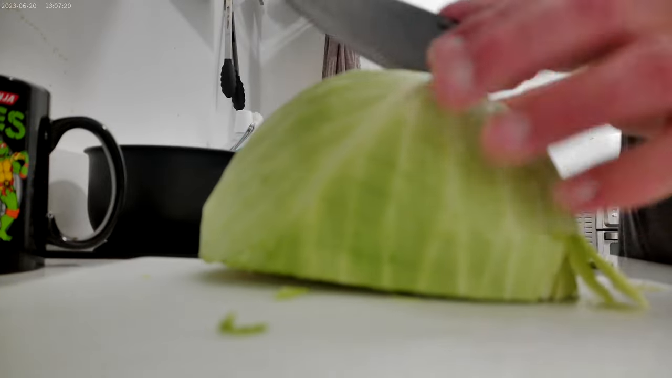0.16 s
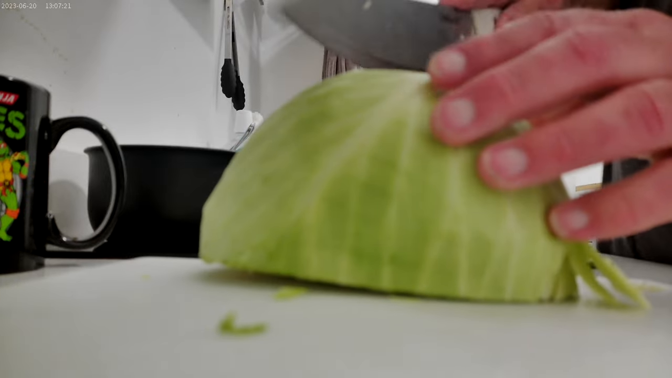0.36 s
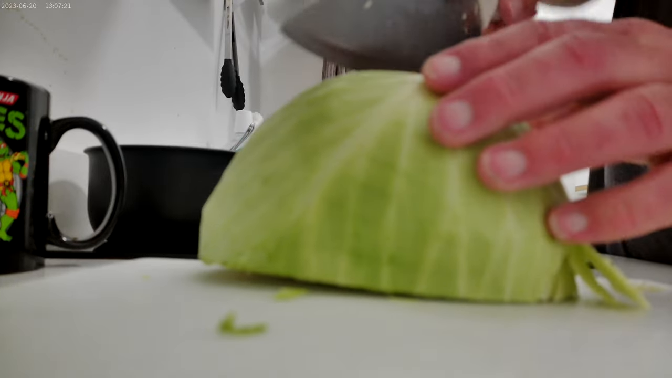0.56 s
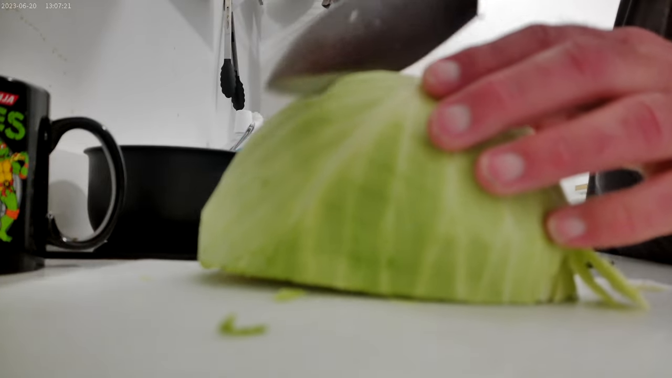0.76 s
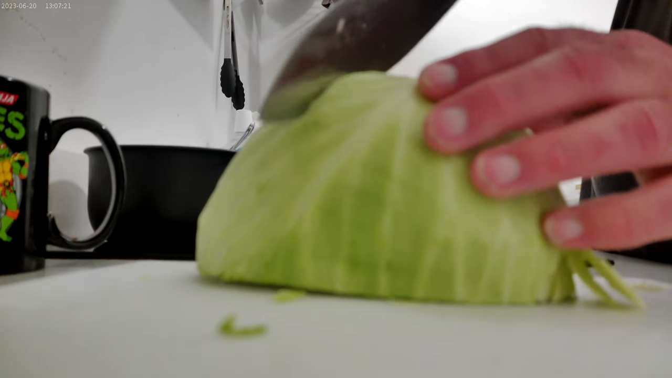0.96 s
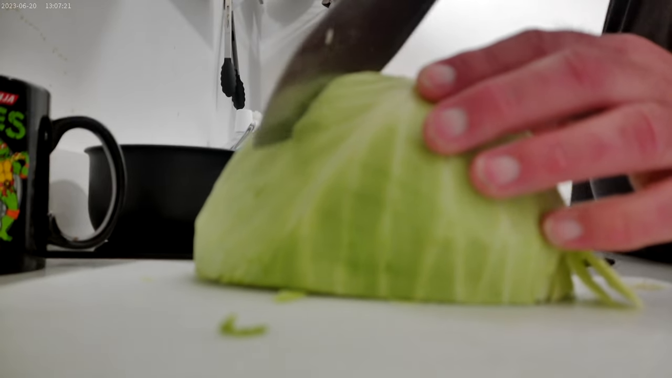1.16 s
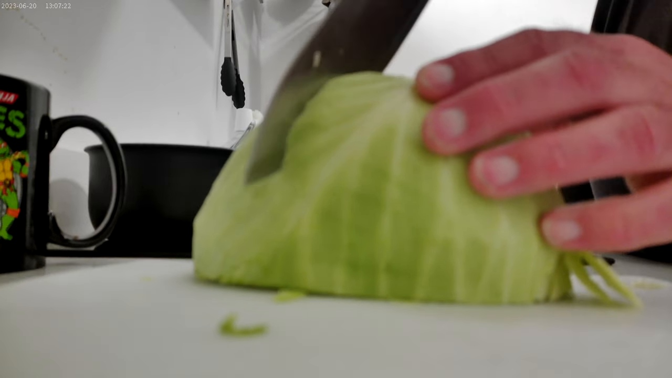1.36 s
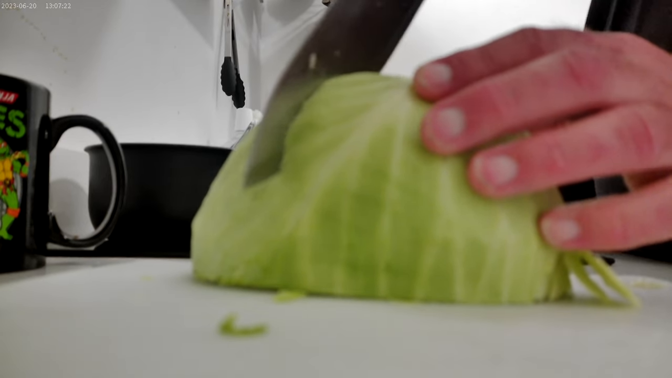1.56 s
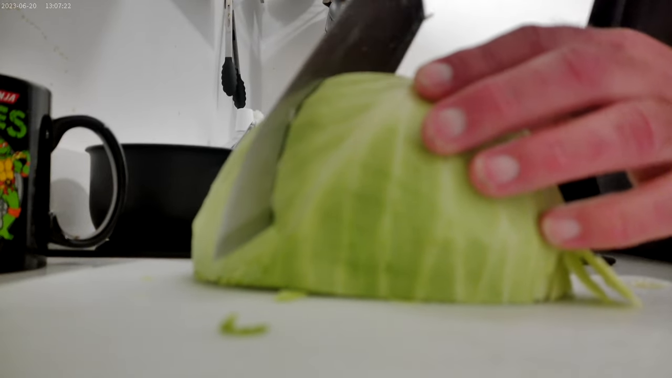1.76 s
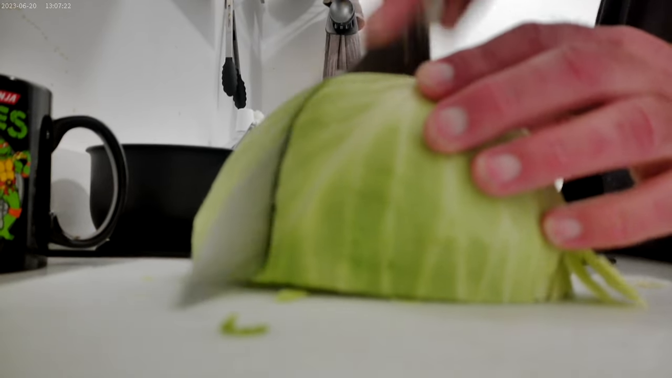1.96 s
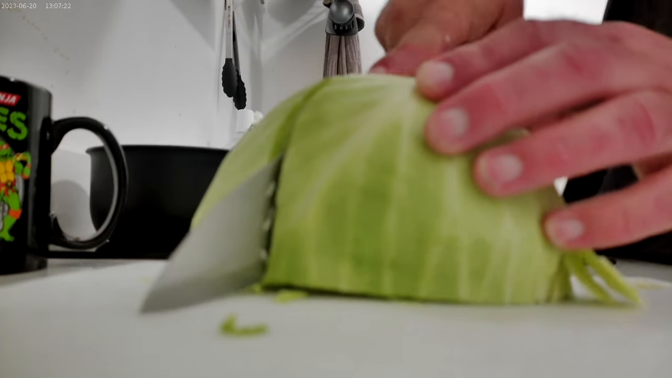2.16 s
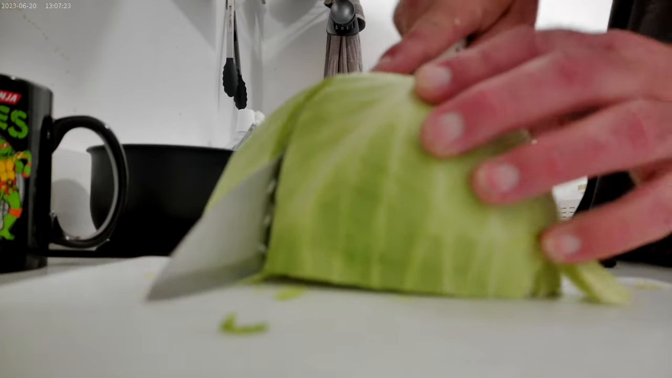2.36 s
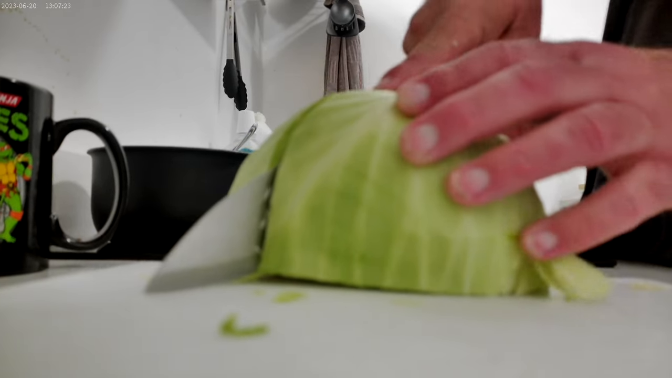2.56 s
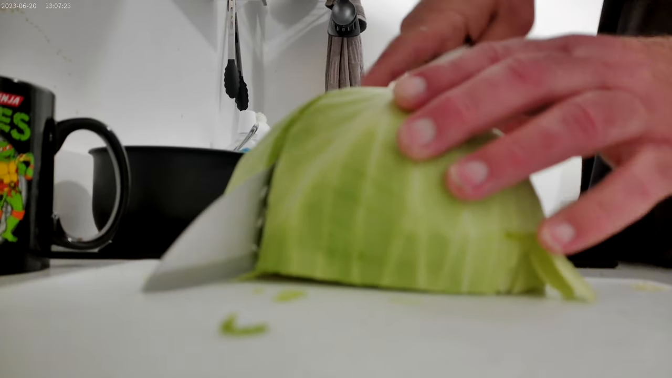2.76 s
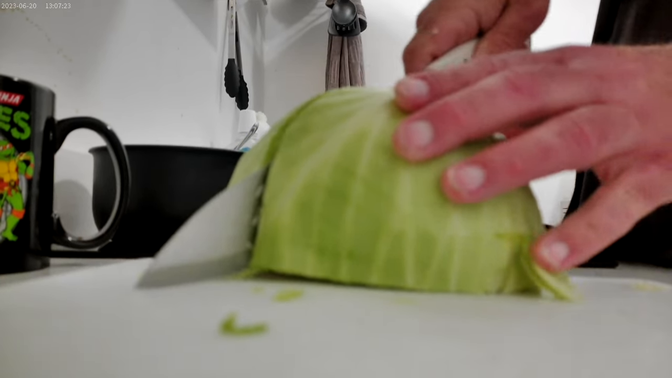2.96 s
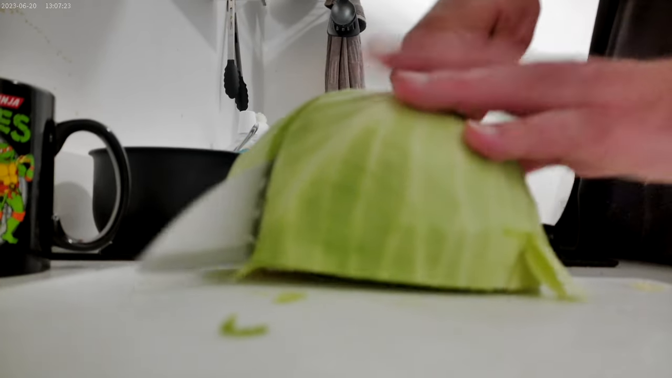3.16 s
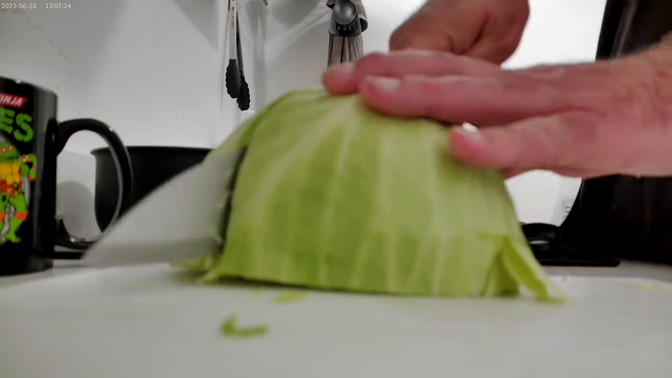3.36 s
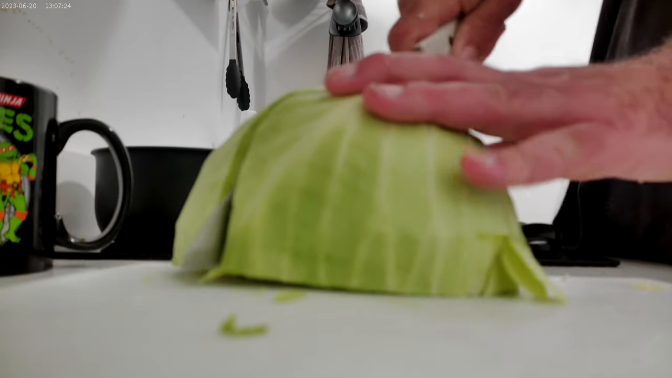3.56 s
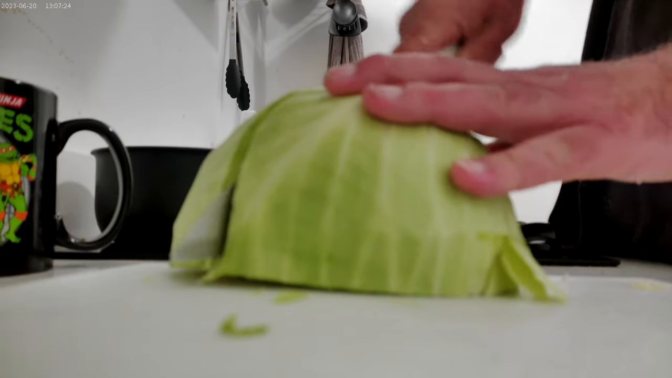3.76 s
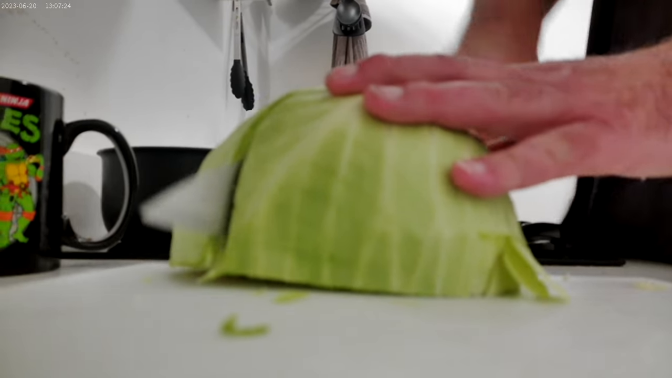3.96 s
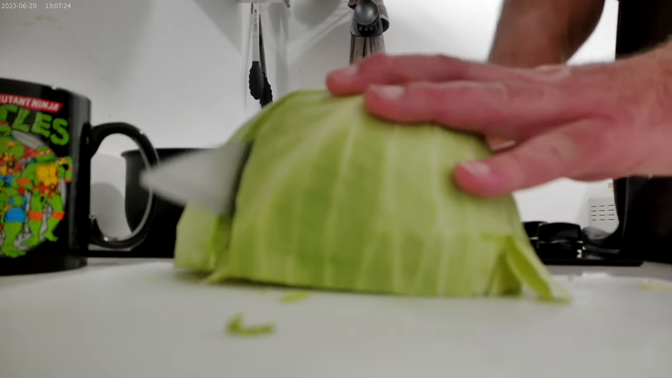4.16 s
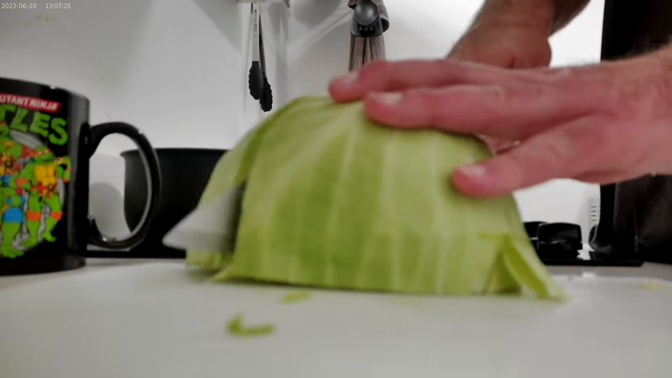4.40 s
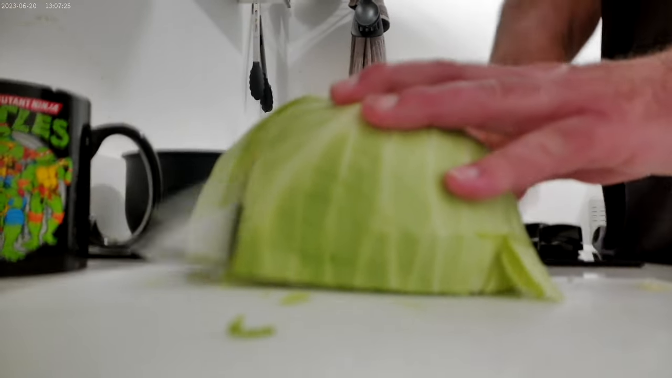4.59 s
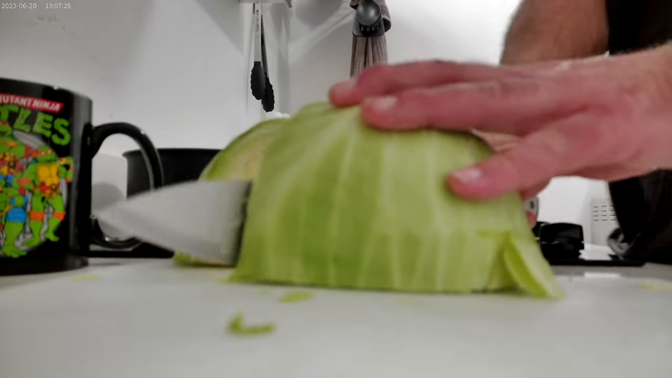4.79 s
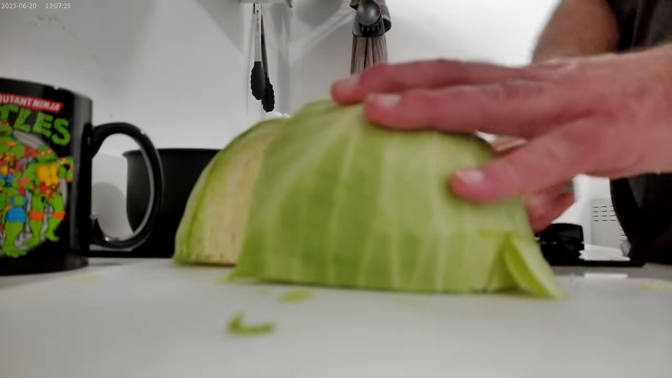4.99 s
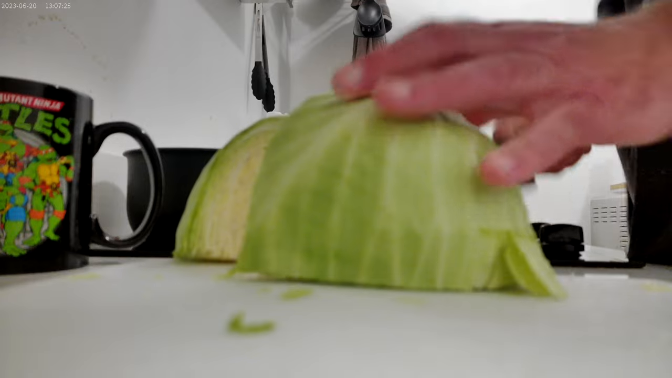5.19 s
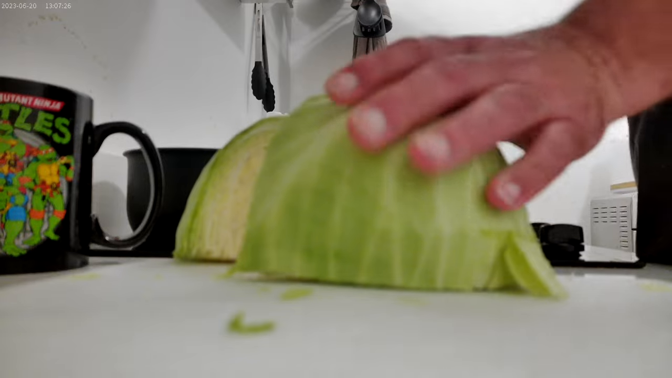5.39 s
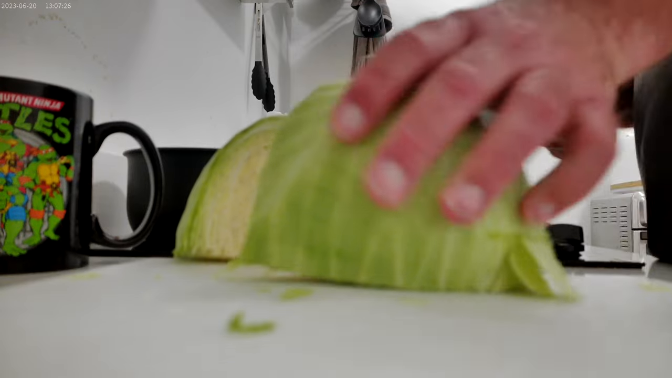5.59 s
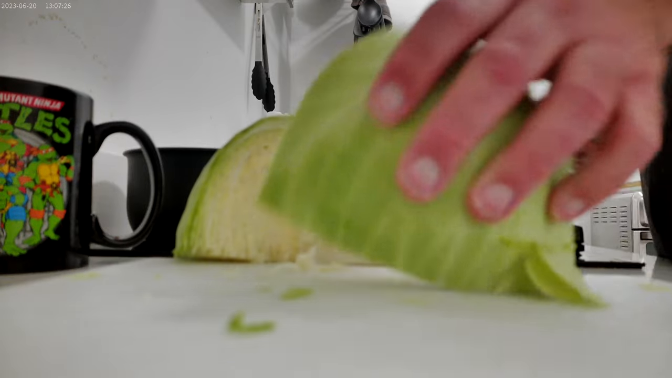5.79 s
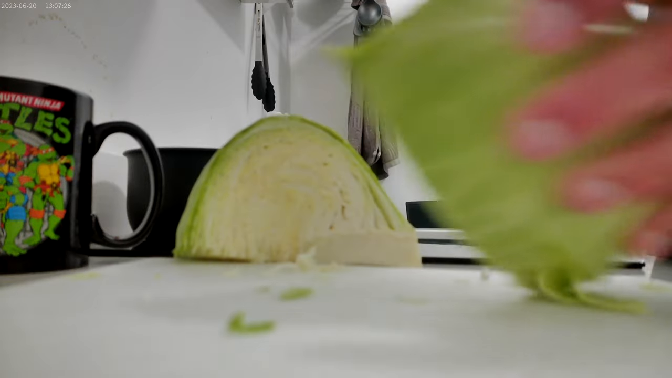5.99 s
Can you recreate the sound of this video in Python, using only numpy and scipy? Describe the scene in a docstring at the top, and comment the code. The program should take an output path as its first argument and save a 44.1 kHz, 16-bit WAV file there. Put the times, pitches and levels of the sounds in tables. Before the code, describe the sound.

A knife cuts into half a cabbage on a plastic board, close to a microphone on the same counter. Small leaf cracks build into hollow crunches, then the blade bangs the board. After more crunching and a short lull, a second run of tearing ends in another loud bang. Dull counter thuds sit under the pushes, and a small kitchen hums faintly throughout.

```python
"""Cutting a cabbage

A knife works through half a cabbage on a plastic board, heard from a microphone on the same counter.
Leaves tear in strokes and single cracks that ring the hollow head, and the counter rocks under the
push. Twice the blade bangs the board and overloads the recorder; when freed, it sings faintly.
A small kitchen hums and rings behind."""
import sys
import numpy as np
from scipy import signal
from scipy.io import wavfile
from scipy.ndimage import uniform_filter1d

SR = 44100
rng = np.random.default_rng(int(sys.argv[2]) if len(sys.argv) > 2 else 0)


def master(y):
    """Save y as 16-bit WAV."""
    cut = np.clip(np.atleast_2d(y).T, -1, 1)
    pcm = np.round(cut * 32767)  # scale
    wavfile.write(sys.argv[1], SR, pcm.astype(np.int16))


N = 266364


def amp(db):
    return 10 ** (np.asarray(db) / 20)


def unit_rms(x):
    return x / np.sqrt(np.mean(x ** 2) + 1e-20)


def curve_at(points, hz):
    point_hz, value = np.transpose(points)
    return np.interp(np.log(hz + 1), np.log(point_hz + 1), value)


def add(mix, start, sound):
    part = mix[round(start * SR):][:len(sound)]
    part += sound[:len(part)]


def burst(size, length, t60, rise):
    """Envelope with a quick attack, held until `length` seconds, then dying away."""
    t = np.arange(size) / SR
    return np.minimum(t / rise, 1) * amp(-60 * np.maximum(t - length, 0) / t60)


def crackle(size, per_s, spread_db):
    """Random clicks of either sign, a few of them large."""
    chance, sign, strength = rng.random((size, 3)).T
    clicks = (chance < per_s / SR) * np.sign(sign - .5)
    return unit_rms(clicks * amp(-spread_db * np.log(strength + 0.09)))


def ring(x, hz, width_hz):
    """One damped mode with steep skirts and a pitch that may wander; white noise keeps its level."""
    carrier = np.exp(2j * np.pi * np.cumsum(hz * np.ones(len(x))) / SR)
    pole = np.exp(-np.pi * width_hz / SR)
    baseband = signal.lfilter([1], np.poly([pole, pole]), x * carrier.conj())
    gain = np.sqrt(2 * (1 - pole ** 2) ** 3 / (1 + pole ** 2))
    return gain * (carrier * baseband).imag


def resonate(force, modes, pitch_hz=None, focus_db=0):
    """A force rings modes, most near its pitch; wet leaves damp them and they drift as layers give."""
    layer_s, drift_share, drift_db = .02, 0.055, 1.5  # time per leaf layer; pitch and level spread
    force = np.r_[force, np.zeros(SR // 50)]
    t = np.arange(len(force)) / SR
    layers = np.arange(0, len(force) / SR + layer_s, layer_s)
    sound = np.zeros(len(force))
    for hz, width_hz, db in modes:
        octaves_off = 0 if pitch_hz is None else np.log2(hz / pitch_hz)
        pitch_drift, level_drift = rng.standard_normal((2, len(layers)))
        level_db = db - focus_db * octaves_off ** 2 + np.interp(t, layers, drift_db * level_drift)
        wandering_hz = hz * (1 + np.interp(t, layers, drift_share * pitch_drift))
        sound += ring(force * amp(level_db), wandering_hz, max(width_hz, hz / 6))
    return sound * np.linalg.norm(force) / np.linalg.norm(sound)


# The tone of the house rumble. Each row: frequency in Hz, relative level in dB.
RUMBLE_SPECTRUM = [(12, -44.5), (20, -12.5), (38, -2.5), (103, -4.5), (147, 1.5), (245, -5), (264, -28),
                   (300, -1), (388, -27.5), (514, -34), (857, -35), (925, -37.5), (2210, -59),
                   (9000, -62.5), (11700, -96), (19800, -120)]


def house_rumble():
    """A bed of low noise, with patches of its spectrum drifting up and down."""
    frames, hz = N // 512 + 5, np.fft.rfftfreq(2048, 1 / SR)
    real, imag, patches = rng.standard_normal((frames, 1025, 3)).T
    patches = unit_rms(uniform_filter1d(uniform_filter1d(patches, size=8, axis=0), size=8, axis=1))
    spectrum = (real + 1j * imag) * amp(curve_at(RUMBLE_SPECTRUM, hz)[:, None] + 0.5 * patches)
    rumble = signal.istft(spectrum, nperseg=2048, noverlap=1536)[1][:N]
    return amp(-54) * unit_rms(rumble)


# The hum of the appliances. Each row: pitch in Hz, rms level in dB.
HUM_TONES = [(75.4, -65.5), (150.7, -62), (183.0, -78), (242.2, -66), (301.5, -71)]


def appliance_hum():
    """Wavering hums, each a narrow band of noise."""
    return sum(amp(db) * ring(rng.standard_normal(N), hz, width_hz=25) for hz, db in HUM_TONES)


# The decay of the room. Each row: frequency in Hz, time to fall 60 dB in seconds.
ROOM_DECAY = [(200, 0.1), (530, 0.087), (1390, 0.25), (3680, 0.12)]


def kitchen_reverb(x):
    """Sparse reflections of random sign, each band dying at its own speed."""
    taps = np.zeros(SR)
    slots = np.arange(300, SR - 20, 20)
    taps[slots + rng.integers(0, 20, len(slots))] = rng.choice([-1., 1.], len(slots))
    hz, t, spectrum = signal.stft(taps, SR, nperseg=256)
    decay = amp(-60 * t / curve_at(ROOM_DECAY, hz)[:, None])
    tail = signal.istft(spectrum * decay, SR, nperseg=256)[1]
    return signal.fftconvolve(x, tail / np.linalg.norm(tail))[:N]


# The low end under each push. Each row: start, rise and fall in seconds, pitch in Hz, level in dB.
COUNTER_ROCKS = [(1.256, 0.016, 0.22, 49, -36), (1.37, 0.0084, 0.12, 62.4, -37),
                 (1.484, 0.0018, 0.14, 58.2, -20.5), (1.592, 0.014, 0.15, 48.2, -38),
                 (1.8, 0.0094, 0.051, 63.6, -19), (1.85, 0.0092, 0.26, 57.2, -39.5),
                 (2.089, 0.005, 0.19, 90.2, -28), (2.167, 0.0055, 0.25, 63, -34.5),
                 (3.908, 0.028, 0.047, 91.3, -43.5), (3.977, 0.039, 0.072, 88.7, -19.5),
                 (4.07, 0.066, 0.094, 99.7, -16.5), (4.226, 0.019, 0.097, 90, -31.5),
                 (4.696, 0.024, 0.4, 89.2, -31.5), (4.763, 0.035, 0.17, 86.4, -18.5),
                 (4.863, 0.015, 0.29, 83.5, -34), (4.788, .01, 0.056, 42, -36)]


def counter_rocking():
    """The counter swings with a dull judder that travels through it into the microphone."""
    out = np.zeros(N)
    low_band = signal.butter(2, [25, 260], "bandpass", fs=SR, output="sos")
    judder = unit_rms(signal.sosfilt(low_band, rng.standard_normal(N)))
    for start, rise, fall, hz, db in COUNTER_ROCKS:
        t = np.arange(0, rise + fall, 1 / SR)
        swell = np.sin(np.pi / 2 * np.interp(t, [0, rise, rise + fall], [0, 1, 0]))
        swing = np.sqrt(2) * swell ** 2 * np.sin(2 * np.pi * hz * t)
        shake = amp(-11.5) * swell * judder[round(start * SR):][:len(t)]
        add(out, start, amp(db) * (swing + shake))
    return out


# Faint glints from the freed blade. Each row: start and length in seconds, level in dB,
# level of the lower tone against the upper in dB.
BLADE_GLINTS = [(2.951, .04, -75, -15.5), (3.09, 0.035, -76, -15.5), (5.069, .23, -77, 0)]


def blade_singing():
    """Light rubbing excites two narrow tones of the steel."""
    out, size = np.zeros(N), SR // 3
    for start, length, db, lower_db in BLADE_GLINTS:
        envelope = burst(size, length, t60=.05, rise=0.0063)
        rub = amp(db) * crackle(size, per_s=1500, spread_db=5.6) * envelope
        add(out, start, amp(lower_db) * ring(rub, 3300, width_hz=440) + ring(rub, 5620, width_hz=440))
    return out


# The crisp top of blade and snapping fibres. Each row: pitch in Hz, width in Hz, relative level in dB.
BLADE_MODES = [(2270, 370, 0), (2600, 730, -1.5), (3300, 390, 2), (3830, 330, -0.5), (4305, 280, -4.5),
               (5700, 130, -3.5), (5300, 350, -25), (7000, 900, -8.5)]


def knife_contact(force, body_modes, crisp_db, pitch_hz=None, focus_db=0):
    """One force rings both the low body and the blade; crispness is the blade's level over the body."""
    body = resonate(force, body_modes, pitch_hz, focus_db)
    return body + resonate(force * amp(crisp_db), BLADE_MODES)


# The ring of the plastic board. Each row: pitch in Hz, width in Hz, relative level in dB.
BOARD_MODES = [(153, 190, -4.5), (304.7, 42, -6.5), (463, 52, -8), (713.2, 220, 4), (908, 317, 4.5),
               (1142, 180, -6), (1563, 140, -4), (1727, 140, -10)]
# The blade hits the board. Each row: start in seconds, level in dB, rattle length in seconds,
# time to fall 60 dB in seconds, base crispness in dB.
BOARD_HITS = [(2.1646, 0, 0.014, 0.033, -28.5), (4.7899, 1, 0.014, 0.32, -18.5)]


def board_bangs():
    """The blow rattles the board on the counter; the treble dies first."""
    out, size = np.zeros(N), SR // 2
    t = np.arange(size) / SR
    treble_db = 11 * np.exp(-t / 0.012) - 43 * t
    for start, db, length, t60, crisp_db in BOARD_HITS:
        envelope = burst(size, length, t60, rise=.0006)
        rattle = amp(db) * crackle(size, per_s=6000, spread_db=2.5) * envelope
        add(out, start, knife_contact(rattle, BOARD_MODES, crisp_db + treble_db))
    return out


def stroke_envelope_db(rise, hold, t60):
    """A stroke swells from 19 dB down, holds, then fades steadily."""
    t = np.arange(0, rise + hold + t60, 1 / SR)
    return -19 * np.maximum(1 - t / rise, 0) - 60 * np.maximum(t - rise - hold, 0) / t60


# The ring of the hollow cabbage head. Each row: pitch in Hz, width in Hz, relative level in dB.
CABBAGE_MODES = [(189, 150, -11.5), (333, 72, 1.5), (418, 130, -2.5), (516.1, 140, -0.5),
                 (614.3, 130, -1.5), (730, 120, -5), (837.7, 210, -0.5), (1164, 277, -3), (1384, 280, -2),
                 (1566, 150, -0.5), (1950, 130, -11), (2400, 260, -17)]
# Strokes of the knife. Each row: start, rise, hold and time to fall 60 dB in seconds, level in dB,
# pitch of the head in Hz, crispness in dB, focus as dB lost one octave off that pitch.
KNIFE_STROKES = [(0.0, 0.002, 0.0026, 0.16, -46, 412, -20.5, 12),
                 (0.87, 0.031, 0.051, 0.022, -52, 1020, -9.5, 60),
                 (0.986, 0.0023, 0.025, 0.2, -52.5, 710, -14, 6),
                 (1.023, 0.015, 0.17, 0.18, -54.5, 534, -23, 9),
                 (1.262, .005, 0.12, 0.76, -55, 900, -22, -2),
                 (1.48, 0.0053, 0.046, 0.11, -27, 586, -26, 4.5),
                 (1.798, 0.0021, 0.083, 0.11, -29, 873, -20.5, 8),
                 (2.0875, 0.0018, 0.021, .1, -25, 694, -18.5, 8.5),
                 (2.125, 0.02, 0.008, 0.02, -16.5, 643, -16.5, 3.5),
                 (2.182, 0.0042, 0.0016, 0.097, -9, 650, -27.5, 29.5),
                 (2.207, 0.016, 0.046, 0.22, -25, 654, -27.5, 11),
                 (2.495, 0.0035, 0.016, 0.018, -39.5, 1200, -28, -0.5),
                 (2.516, 0.006, 0.08, 0.091, -19.5, 643, -34, 6),
                 (2.59, 0.025, 0.051, 0.069, -17.5, 572, -26.5, 8.5),
                 (2.983, 0.0034, 0.0018, 0.15, -40.5, 642, -38, 48),
                 (3.237, 0.028, .02, 0.44, -68.5, 1402, -7, 11),
                 (3.309, 0.21, 0.057, 0.17, -58, 900, -20, 17),
                 (3.621, 0.038, 0.039, 0.05, -29.5, 870, -31, 13.5),
                 (3.707, 0.013, 0.029, 0.28, -29, 930, -26.5, 19),
                 (3.961, 0.042, 0.019, 0.78, -33.5, 837, -22, 19),
                 (4.011, .12, .01, .27, -24.5, 763, -27, 4),
                 (4.251, 0.082, 0.0064, 0.052, -52.5, 700, -9, 11.5),
                 (4.344, 0.055, 0.067, 0.2, -36.5, 937, -16, 11),
                 (4.762, 0.026, .002, 0.031, -12.5, 997, -13, 7.5),
                 (5.192, 0.078, 0.0051, 0.23, -64, 1485, -8, 17.5)]


def tearing_strokes():
    """The blade sticks and slips from leaf to leaf, tearing a dense stream of fibres."""
    brighten_db_per_s = 58.5  # the treble grows while the blade bears down
    treble_holds = 0.061  # share of a swell or fade that the treble does not follow
    out = np.zeros(N)
    slips = unit_rms(uniform_filter1d(uniform_filter1d(rng.standard_normal(N), size=400), size=400))
    surge_db = 0.48 * np.tanh(slips)  # a harder slip is both louder and crisper
    fibres = crackle(N, per_s=4000, spread_db=4.2)
    for start, rise, hold, t60, db, hz, crisp_db, focus_db in KNIFE_STROKES:
        envelope_db = stroke_envelope_db(rise, hold, t60)
        span = slice(round(start * SR), round(start * SR) + len(envelope_db))
        tear = amp(db + envelope_db + surge_db[span]) * fibres[span]
        pressed_s = np.clip(np.arange(len(tear)) / SR - rise, 0, hold)
        treble_db = surge_db[span] - treble_holds * envelope_db + brighten_db_per_s * pressed_s
        add(out, start, knife_contact(tear, CABBAGE_MODES, crisp_db + treble_db, hz, focus_db))
    return out


# Single cracks of thick leaves. Each row: start in seconds, level in dB, pitch in Hz,
# crispness in dB, length in seconds.
LEAF_CRACKS = [(0.9624, -15.5, 744, -24, 0.018), (0.975, -32.5, 810, -22, 0.014),
               (1.049, -44.5, 700, -16.5, 0.01), (1.1, -54, 690, -10.5, 0.003),
               (1.126, -54, 700, -17, 0.0037), (1.167, -58.5, 700, -1, 0.0074),
               (1.183, -64, 705, 1, 0.0075), (1.235, -62, 695, -3, 0.0054),
               (1.252, -37.5, 1670, -11.5, 0.014), (1.274, -32.5, 900, -14, 0.012),
               (1.286, -28.5, 904, -25, 0.015), (1.37, -36.5, 1350, -6, 0.0098),
               (1.4, -36, 840, -22, 0.0092), (1.473, -28, 552, -8, 0.0034), (1.481, -30.5, 582, -7, 0.014),
               (1.511, -19, 520, -10.5, 0.0022), (1.804, -12.5, 807, -18, 0.0054),
               (1.817, -26, 850, -17, 0.0097), (1.872, -29, 1350, -8, 0.0069),
               (1.878, -27.5, 657, -14, 0.0081), (2.094, -22, 852, -40, 0.0051),
               (2.127, -11.5, 792, -33, 0.0015), (2.196, -8.5, 656, -21, 0.0018),
               (2.249, -37, 560, -11.5, 0.012), (2.272, -28, 560, -22.5, 0.02),
               (2.952, -43, 557, -43, 0.034), (3.098, -43, 453, -50, 0.015),
               (3.204, -32, 1550, -52, 0.0037), (3.205, -43.5, 2400, -44.5, 0.0037),
               (3.222, -52.5, 1608, -10.5, 0.0048), (3.405, -67, 1602, -2, 0.0045),
               (3.483, -47, 1055, -25.5, 0.013), (3.75, -29, 800, -39, 0.006),
               (3.759, -25, 800, -34, 0.0033), (3.982, -39, 870, 4, 0.0019),
               (3.988, -25.5, 750, -51, 0.007), (4.131, -18, 595, -20.5, 0.0029),
               (4.171, -45, 690, 1.5, 0.0047), (4.244, -37.5, 924, -13.5, 0.017),
               (4.282, -34.5, 627, -13.5, 0.0051), (4.352, -42.5, 787, -3.5, 0.0054),
               (4.394, -36.5, 690, -8.5, 0.02), (4.459, -24, 953, -24, 0.0045),
               (4.487, -39, 898, -12, 0.007), (4.711, -42, 1297, -2, 0.011),
               (4.759, -18, 1480, -16, 0.0024), (5.266, -51.5, 1501, -7.5, .0028),
               (5.293, -57, 1740, -4.5, 0.0066)]


def leaf_cracks():
    """A short clump of fibres snaps and rings the head."""
    out, size = np.zeros(N), 1600
    for start, db, hz, crisp_db, length in LEAF_CRACKS:
        envelope = burst(size, length, t60=0.011, rise=0.0012)
        clump = unit_rms(crackle(size, per_s=6000, spread_db=6) * envelope)
        snap = amp(db) * clump * np.sqrt(np.mean(envelope ** 2))
        focus_db = 15 + 151.5 * length  # a longer crack rings more narrowly around its pitch
        add(out, start, knife_contact(snap, CABBAGE_MODES, crisp_db, hz, focus_db))
    return out


def scene():
    """Close knife work with a touch of room, over the counter's low end and the room tone, in mono."""
    knife = tearing_strokes() + leaf_cracks() + board_bangs() + blade_singing()
    room = amp(-15.5) * kitchen_reverb(knife)
    return (knife + room + counter_rocking() + house_rumble() + appliance_hum())[None]


def record(dry):
    """The microphone rolls off steeply; loud blows hit a firm ceiling and splash up to the band limit."""
    ceiling, knee, band_limit_hz = .72, 6., 8900
    heard = signal.sosfilt(signal.cheby2(8, 40, 8100, fs=SR, output="sos"), dry)
    clipped = heard / (1 + abs(heard / ceiling) ** knee) ** (1 / knee)
    softened = signal.sosfilt(signal.butter(6, 7500, fs=SR, output="sos"), clipped)
    band_limit = signal.firwin(255, band_limit_hz, window=("kaiser", 9), fs=SR)
    hiss = amp(-103) * rng.standard_normal(dry.shape)
    return signal.oaconvolve(softened, band_limit[None], "same") + hiss


dry = scene()
out = record(dry)
master(out)
```